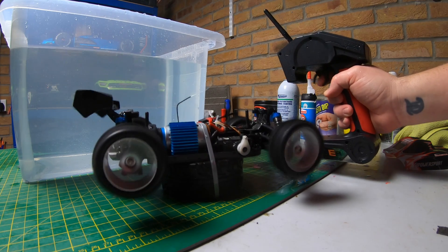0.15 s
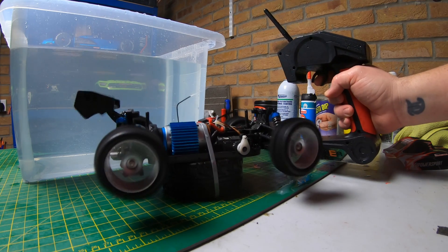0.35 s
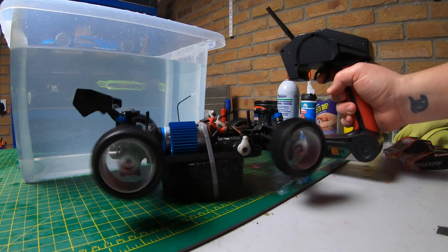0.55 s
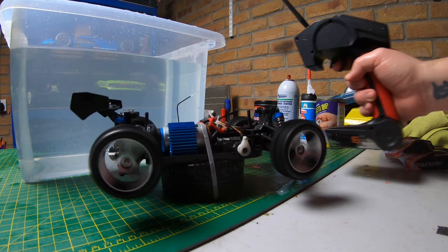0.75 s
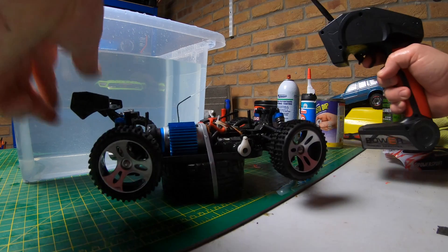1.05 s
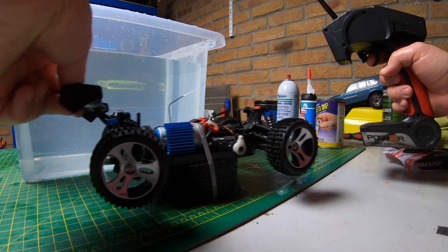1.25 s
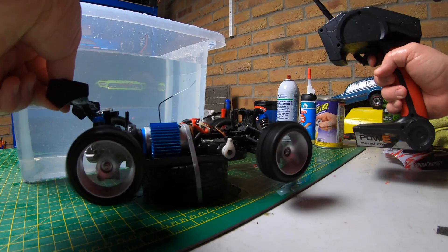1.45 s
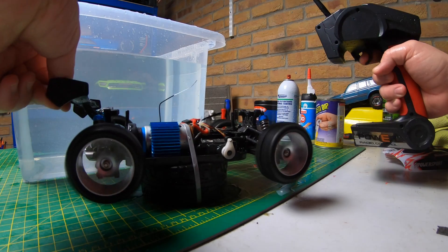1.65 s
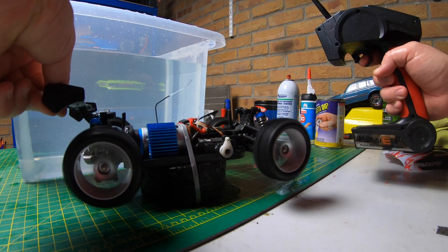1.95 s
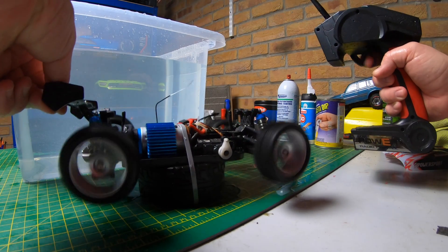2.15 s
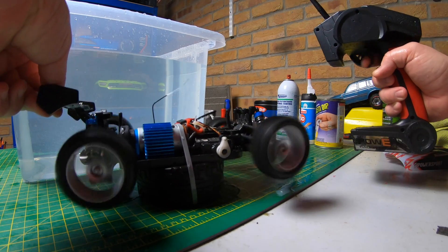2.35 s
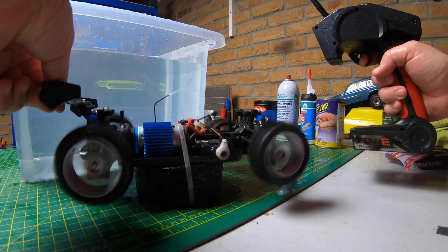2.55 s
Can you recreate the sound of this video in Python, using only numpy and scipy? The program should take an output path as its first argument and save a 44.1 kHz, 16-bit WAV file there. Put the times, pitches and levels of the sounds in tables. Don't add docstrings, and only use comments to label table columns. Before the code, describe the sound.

A small electric model car with wheels spinning free whines high, slows into plastic rattle and scrapes, nearly stops with a few ticks and hand rustle, then revs in four short bursts; close microphone, small dry room.

```python
import sys
import numpy as np
from scipy import signal
from scipy.fft import rfft, irfft
from scipy.io import wavfile
from scipy.ndimage import uniform_filter1d

SR = 44100
rng = np.random.default_rng(int(sys.argv[2]) if len(sys.argv) > 2 else 0)


def volts_from_db(level):
    exponent = np.asarray(level, float) / 20
    return 10 ** exponent


def store_pcm(level_fs):
    pcm = np.round(np.clip(level_fs, -1, 1) * 32767).astype(np.int16)
    wavfile.write(sys.argv[1], SR, np.atleast_2d(pcm).T)


N = 119070

# (time [s], tooth rate [Hz], tooth load [dB])
PULL_1 = [
    (0, 5510, -42),
    (.13, 6023, -39),
]
PULL_2 = [(1.433, 732.6, -37.5), (1.455, 1129, -27.5), (1.468, 1387, -39), (1.48, 1740, -36.5),
          (1.501, 2110, -34), (1.508, 2185, -35), (1.514, 2320, -31), (1.525, 2300, -44),
          (1.539, 2364, -28)]
PULL_3_BITE = [(1.706, 1337, -38), (1.72, 1345, -56), (1.729, 1477, -55), (1.741, 1650, -32.5),
               (1.755, 1704, -28.5)]
PULL_3 = [(1.758, 2125, -24.5), (1.772, 2440, -35.5), (1.778, 2876, -27.5), (1.786, 3052, -34.5),
          (1.799, 3600, -27), (1.824, 4330, -31), (1.845, 4830, -34), (1.862, 5233, -35),
          (1.885, 5813, -41)]
PULL_4 = [(2.174, 3600, -40), (2.185, 3470, -25), (2.195, 3380, -34), (2.203, 3650, -42),
          (2.222, 4250, -25.5), (2.255, 4900, -35.5), (2.3, 5450, -33), (2.335, 5750, -46)]
PULL_5 = [(2.597, 2647, -33), (2.61, 2706, -31.5), (2.621, 2823, -34), (2.635, 3270, -30),
          (2.649, 3544, -20), (2.657, 3730, -26), (2.666, 3900, -35.5), (2.7, 4400, -38.5)]
PULLS = [PULL_1, PULL_2, PULL_3_BITE, PULL_3, PULL_4, PULL_5]
# (time [s], tooth rate [Hz])
COAST_SPEED = [
    (.38, 3387),
    (0.499, 1911),
]
STOP_S, START_S = .93, 1.385

# (multiple, level [dB], loudest tooth rate [Hz], distance off it for 4 dB less [Hz])
TOOTH_PARTIALS = [(1, 2, 630, 5000), (2, 4.5, 2380, 600), (3, -3, 1750, 550), (4, -0.5, 1550, 452),
                  (5, -3.5, 1300, 400), (6, -3, 1500, 253)]
# (ratio to tooth rate, level under load [dB], level coasting [dB], width [Hz])
WHEEL_GEARS = [(.635, -28, -66, 260), (0.42, -33.5, -65, 190)]
# (frequency [Hz], level [dB])
WHINE_TREBLE = [(1200, -1), (2200, -2), (3300, 0), (6800, -1), (11000, -10)]
# (frequency [Hz], half width [Hz], level [dB])
WEAK_PITCHES = [(2150, 250, -9), (3900, 120, -6), (4480, 60, -3), (5250, 180, -7), (7800, 700, -8)]
# (time [s], frequency [Hz], level [dB])
AXLE_WHINES = [
    [(.17, 2140, -39.5), (.25, 1870, -43), (.3, 1680, -44), (.35, 1460, -39.5), (.42, 1256, -45),
     (.5, 1090, -55)],
    [(1.91, 2025, -47), (1.96, 1930, -39.5), (2.02, 1690, -42), (2.09, 1530, -40.5), (2.13, 1387, -43),
     (2.185, 1287, -31)],
    [(2.36, 2000, -62), (2.47, 1527, -45), (2.6, 1204, -49)],
]
# (middle [s], frequency [Hz], length [s], level [dB])
PANEL_FLARES = [(0.03, 2690, .06, -28), (0.013, 3530, .035, -40), (0.06, 2860, .04, -32),
                (0.109, 2770, .05, -31), (.115, 2950, .03, -38), (0.106, 2340, .06, -33),
                (0.093, 1300, .07, -34.5), (0.358, 3600, .03, -34.5), (.72, 2850, .016, -42.5),
                (0.793, 2800, .014, -48), (0.829, 2814, .025, -52), (1.414, 1140, .012, -40.5),
                (1.5, 6250, .014, -26), (1.715, 2720, .016, -31.5), (1.867, 3354, .03, -27.5),
                (2.179, 1160, .02, -29.5), (2.18, 2542, .01, -30), (2.299, 2692, .025, -29),
                (2.304, 3610, .025, -36), (2.603, 1258, .016, -27)]

# (time [s], level [dB])
RATTLE_DOWN = [(0, -23.5), (.12, -24), (.17, -25), (.45, -28.5), (.6, -30.5), (.7, -35.5), (.8, -42),
               (.93, -64)]
# (time [s], level [dB])
RATTLE_UP = [(1.385, -70), (1.43, -30), (1.47, -27), (1.56, -26.5), (1.69, -29.5), (1.74, -27), (1.8, -30),
             (1.86, -23), (1.92, -27.5), (2.17, -28.5), (2.21, -26), (2.245, -23), (2.44, -25.5),
             (2.5, -26.5), (2.6, -28.5), (2.66, -27.5), (2.7, -22.5)]
# (time [s], peak [dB], length [s])
WHEEL_SCRAPES = [(0.497, -24, 0.017), (0.559, -13.5, 0.011), (0.636, -46, 0.0083), (0.713, -23.5, 0.015),
                 (0.752, -15, 0.012), (0.787, -28.5, 0.016), (0.82, -28.5, 0.027), (0.849, -36, 0.013)]
# (from [s], to [s])
TAUT_SPANS = [
    (2.185, 2.23),
    (2.61, 2.685),
]
# (time [s], peak [dB], ring [Hz], treble [dB])
BACKLASH_TICKS = [(.822, -45, 1300, 8.5), (.851, -36, 890, -12), (0.88, -47, 1330, 3), (.888, -50, 1300, 0),
                  (0.9, -38, 1360, 1), (1.0, -34, 997, -17.5), (1.105, -39, 910, -9),
                  (1.185, -42.5, 1400, -24), (1.244, -43, 770, -43), (1.349, -42, 1180, -8.5),
                  (1.372, -61, 1300, -8), (1.381, -49, 1400, -7), (1.397, -35, 1240, 2.5)]
# (frequency [Hz], level [dB per Hz])
FRAME_COLOUR = [(150, -44), (250, -20), (675, -15), (801, -6.5), (1560, -5), (3210, -2.5), (10400, -12.5),
                (15000, -25.5)]
# (frequency [Hz], width [Hz], level [dB])
FRAME_MODES = [(659, 76, 7.5), (1110, 200, 1), (1300, 243, 9.5), (2730, 610, -2), (3296, 580, 2.5),
               (4268, 22, -5.5), (4784, 480, 0), (5690, 1260, 4.5), (6960, 2700, 4)]

# (frequency [Hz], level [dB])
SWITCH_TONES = [(1990, -54), (4000, -51), (5997, -61), (7989, -58), (9986, -63)]

# (time [s], level [dB])
TABLE_SWAY = [(0, -52), (.13, -40.5), (.3, -44.5), (.51, -40), (.75, -42), (.92, -44.5), (1.34, -49),
              (1.44, -64), (1.62, -60), (1.7, -69), (1.87, -47.5), (2.55, -50), (2.67, -42.5)]
# (time [s], level [dB])
WHEEL_WOBBLE = [(0, -51), (.2, -34.5), (.32, -46), (.46, -41.5), (.505, -27), (.56, -32), (.6, -38),
                (.68, -36.5), (.76, -49.5), (.93, -72), (1.3, -60), (1.45, -62), (1.69, -62.5), (1.9, -50),
                (2.08, -48.5), (2.22, -41.5), (2.5, -46.5), (2.57, -50), (2.65, -51)]
# (frequency [Hz], width [Hz], level [dB])
TABLE_MODES = [(72.3, 61, 2), (93, 24, -11), (133.3, 30, 2.5), (172, 17, -17), (285, 720, -16)]
# (time [s], frequency [Hz], length [s], level [dB])
HAND_BUMP = (1.05, 250, .035, -56)

# (frequency [Hz], level [dB per Hz])
AIR_COLOUR = [(35, -42), (60, -25), (93, -37), (236, -17.5), (390, -30), (846, -25), (3640, -33),
              (10200, -46), (14000, -99)]
# (time [s], level [dB])
HAND_RUSTLE = [(.95, -7.5), (1.01, -6.5), (1.035, 2.5), (1.08, -6.5), (1.15, -11.5), (1.2, -2),
               (1.27, -3.5), (1.295, 3.5), (1.315, 1.5), (1.34, -5)]
# (frequency [Hz], likeness)
PORT_LIKENESS = [(60, -2.9), (240, 0.88), (940, 0.72), (3720, 0.95), (14700, -0.71)]
# (frequency [Hz], left minus right [dB])
PORT_LEAN = [(60, -1), (240, -6), (940, 7.5), (3720, 1), (14700, -4.5)]
# (frequency [Hz], level [dB])
CAPSULES = [(10400, -0.5), (11000, -11.5), (13500, -6), (14600, -7), (15100, -24)]


def evened(x):
    return x / np.sqrt(np.mean(x ** 2) + 1e-20)


def read(points, hz):
    f, value = np.transpose(points)
    return np.interp(np.log(hz + 1), np.log(f + 1), value)


def curve(rows, column=1, off=None):
    rows = np.array(rows)
    return np.interp(np.arange(N) / SR, rows[:, 0], rows[:, column], off, off)


def add(mix, s, sound):
    part = mix[round(s * SR):][:len(sound)]
    part += sound[:len(part)]


def resonate(x, hz, width):
    turn = np.exp(2j * np.pi * np.cumsum(hz * np.ones(len(x))) / SR)
    r = np.exp(-np.pi * width / SR)
    return 2 * (turn * signal.lfilter([1 - r], [1, -r], x / turn + 1e-18)).real


def colour(x, points):
    return irfft(rfft(x) * volts_from_db(read(points, np.fft.rfftfreq(N, 1 / SR))), N)


def dull(x):
    return signal.lfilter(*signal.butter(3, 6420, fs=SR), x)


def wander(per_s):
    size = max(int(SR / per_s), 1)
    noise = uniform_filter1d(rng.standard_normal(N), size)
    return evened(uniform_filter1d(noise, size))


def clicks(per_s, spread_db):
    size = volts_from_db(spread_db * np.minimum(rng.exponential(1, N), 3.5))
    size = size * rng.choice([-1., 1.], N)
    return evened(size * (rng.random(N) < per_s / SR))


def chassis(drive, patch_db, ring_db):
    ring = 0
    for hz, width, db in FRAME_MODES:
        mode = resonate(drive, hz, width) * np.sqrt(hz / width / 10)
        ring = ring + volts_from_db(db + patch_db * wander(36)) * mode
    return drive + volts_from_db(ring_db) * ring


def background_air():
    air = evened(colour(rng.standard_normal(N), AIR_COLOUR))
    return volts_from_db(-57 + curve(HAND_RUSTLE) + 1.5 * wander(30)) * air


def table():
    t = np.arange(N) / SR
    moving = curve([(STOP_S - .2, 1), (STOP_S, 0), (START_S, 0), (START_S + 0.37, 1)])
    sway_hz, lead_rad, left_db, rough = 38.5, 1, -14.5, 1
    left = np.sin(2 * np.pi * sway_hz * t + lead_rad) * volts_from_db(left_db)
    right = np.sin(2 * np.pi * sway_hz * t)
    fuzz = evened(resonate(resonate(rng.standard_normal(N), 37, 30.0), 30, 33.0))
    sway = 2 * (1 - 0.18 * moving) * np.array([left, right])
    sway = sway + rough * moving * fuzz * volts_from_db(np.array([[-2.5], [2.5]]))

    thumps_per_s = 79
    drive = clicks(thumps_per_s, 0.72) + rng.standard_normal(N) / 2
    thump = np.zeros(N)
    for hz, width, db in TABLE_MODES:
        thump += volts_from_db(db) * evened(resonate(resonate(drive, hz, width), hz, 3 * width))

    s, hz, length, db = HAND_BUMP
    bump = volts_from_db(db) * np.exp(-((t - s) / length) ** 2) * np.sin(2 * np.pi * hz * t)
    return sway * volts_from_db(curve(TABLE_SWAY)) + evened(thump) * volts_from_db(curve(WHEEL_WOBBLE)) + bump


def controller():
    t = np.arange(N) / SR
    on = uniform_filter1d(1. * (t > 1.372) * (t < 1.45), 100)
    swell = volts_from_db(120 * np.clip(t - 1.39, -.1, .06))
    out = np.zeros(N)
    for order, (hz, db) in enumerate(SWITCH_TONES):
        fade = volts_from_db(-300 * np.maximum(t - 1.41, 0) * order)
        out += swell * fade * volts_from_db(db + 6.5) * np.sin(2 * np.pi * hz * t)
    return on * out


def ticks():
    ring_t60_s, snap_t60_s, rise_s = 0.015, 0.016, 0.00061
    out, snaps, t = np.zeros(N), np.zeros(N), np.arange(1500) / SR
    for s, db, hz, treble_db in BACKLASH_TICKS:
        ring = np.sin(2 * np.pi * hz * t) * np.minimum(t / rise_s, 1)
        add(out, s, volts_from_db(db - 60 * t / ring_t60_s) * ring)
        snap = rng.standard_normal(len(t))
        add(snaps, s, volts_from_db(db + treble_db - 60 * t / snap_t60_s) * snap)
    return out + volts_from_db(5) * dull(colour(chassis(snaps, 0, 1.35), FRAME_COLOUR))


def flares():
    out, t = np.zeros(N), np.arange(4000) / SR
    for s, hz, length, db in PANEL_FLARES:
        rough = evened(resonate(rng.standard_normal(len(t)), hz, 150))
        tone = np.sin(2 * np.pi * hz * t) + rough / np.sqrt(2)
        swell = np.sin(np.pi * np.minimum(t / length, 1))
        add(out, max(s - length / 2, 0), volts_from_db(db + 4.5) * tone * swell)
    return out


def coasting():
    jitter, break_db = .018, 4
    out = np.zeros(N)
    for rows in AXLE_WHINES:
        turns = np.cumsum(curve(rows) * (1 + jitter * wander(162))) / SR
        level = uniform_filter1d(volts_from_db(curve(rows, column=2, off=-120)), 300)
        out += level * volts_from_db(5 + break_db * wander(90)) * np.sin(2 * np.pi * turns)
    return out


def rattle(speed):
    wheel_ratio, wheel_db, flutter_db = .012, 1.2, .7
    wheel = np.sin(2 * np.pi * np.cumsum(wheel_ratio * speed) / SR + 3.3 * wander(9.4))
    level = volts_from_db(curve(RATTLE_DOWN, off=-120)) + volts_from_db(curve(RATTLE_UP, off=-120))
    level = level * volts_from_db(wheel_db * wheel + flutter_db * wander(36.0))
    for s, db, length in WHEEL_SCRAPES:
        swell = abs(np.hanning(round(length * SR) + 2)) ** 0.44
        add(level, s, volts_from_db(db - 16.0) * swell)

    hiss_share, ticks_per_s, spread_db = 0.5, 2500, 3
    drive = hiss_share * rng.standard_normal(N) + (1 - hiss_share) * clicks(ticks_per_s, spread_db)
    frame = evened(colour(chassis(drive, patch_db=2.2, ring_db=5.5), FRAME_COLOUR))
    for a, b in TAUT_SPANS:
        tight = uniform_filter1d(curve([(a, .5), (b, .5)], off=0), 200)
        frame = frame - tight * resonate(frame, 2070, 2360)

    restarted = np.arange(N) > START_S * SR
    bright = np.clip(0.21 + uniform_filter1d(speed, 4000) / 2730 + restarted, 0, 1)
    return level * (bright * frame + (1 - bright) * dull(frame))


def gears(speed, load):
    turns = np.cumsum(speed * (1 + 0.01042 * wander(311))) / SR
    push = uniform_filter1d(sum(volts_from_db(curve(pull, column=2, off=-120)) for pull in PULLS), 200)
    break_db = 2.8
    teeth = np.zeros(N)
    for k, db, best, spread in TOOTH_PARTIALS:
        level = db - 4.0 * ((speed - best) / spread) ** 2 + break_db * wander(170)
        teeth += volts_from_db(level) * np.sin(2 * np.pi * k * turns)
    out = push * teeth / 2

    turning = np.clip(speed / 1500 - 1.1, 0, 1)
    favoured = volts_from_db(-6 * load * ((speed - 5150) / 800) ** 2)
    for ratio, load_db, coast_db, width in WHEEL_GEARS:
        mesh = resonate(rng.standard_normal(N), ratio * speed, width)
        mesh = evened(resonate(mesh, ratio * speed, 2 * width))
        out += mesh * volts_from_db(coast_db + (load_db - coast_db) * load) * favoured * turning / 3

    hz = np.fft.rfftfreq(N, 1 / SR)
    dips = volts_from_db(sum(db * np.exp(-((hz - at) / width) ** 2) for at, width, db in WEAK_PITCHES))
    whine = irfft(rfft(out) * dips, N)
    return colour(chassis(whine, patch_db=2.3, ring_db=9), WHINE_TREBLE)


def ports(x):
    hz, t = np.fft.rfftfreq(N, 1 / SR), np.arange(3000) / SR
    same = np.clip(read(PORT_LIKENESS, hz), 0, 1)
    lean = volts_from_db(np.clip(read(PORT_LEAN, hz), -3, 2) / 2)
    smear = rfft(evened(rng.standard_normal(3000) * volts_from_db(-60 * t / 0.15)), N)
    smear /= abs(smear) + 1e-9
    mid = np.sqrt((1 + same) / 2)
    side = np.sqrt(1 - same) * 1j * smear.real
    return irfft(rfft(x) * np.array([(mid + side) * lean, (mid - side) / lean]), N)


def room(x):
    t = np.arange(SR // 2) / SR
    t60_s, gap_s = 0.16, .005
    tail = rng.standard_normal((2, len(t))) * volts_from_db(-60 * t / t60_s) * (t > gap_s)
    return signal.fftconvolve(x[None], tail / np.linalg.norm(tail[0]), axes=1)[:, :N]


def scene():
    rows = [r[:2] for r in PULL_1] + COAST_SPEED + [(STOP_S, 0), (START_S, 0)]
    rows += [r[:2] for pull in PULLS[1:] for r in pull]
    speed = abs(uniform_filter1d(curve(rows), 150))
    load = sum(curve([(pull[0][0], 1), (pull[-1][0], 1)], off=0) for pull in PULLS)
    load = uniform_filter1d(load, 600)
    car = controller() + ticks() + flares() + coasting() + rattle(speed) + gears(speed, load)
    return ports(car + background_air()) + volts_from_db(-13) * room(car) + table()


def roll_off(x):
    return signal.sosfilt(signal.butter(12, 15320, fs=SR, output="sos"), x)


def record(dry):
    limit = 0.29
    mix = limit * np.tanh(colour(dry, CAPSULES) / limit)
    return roll_off(mix)


dry = scene()
out = record(dry)
store_pcm(out)
```